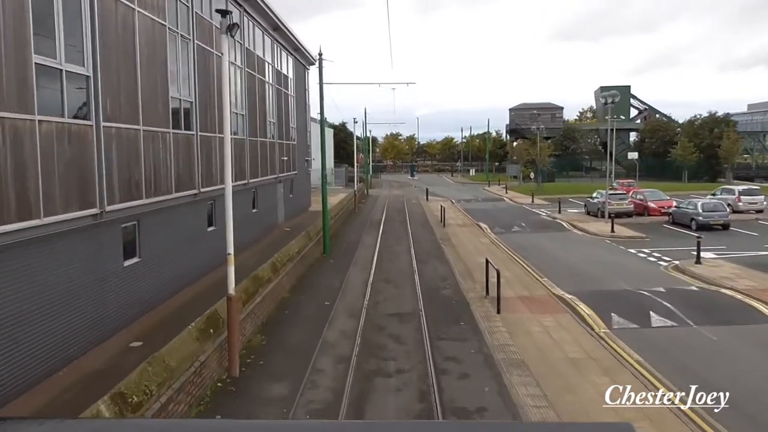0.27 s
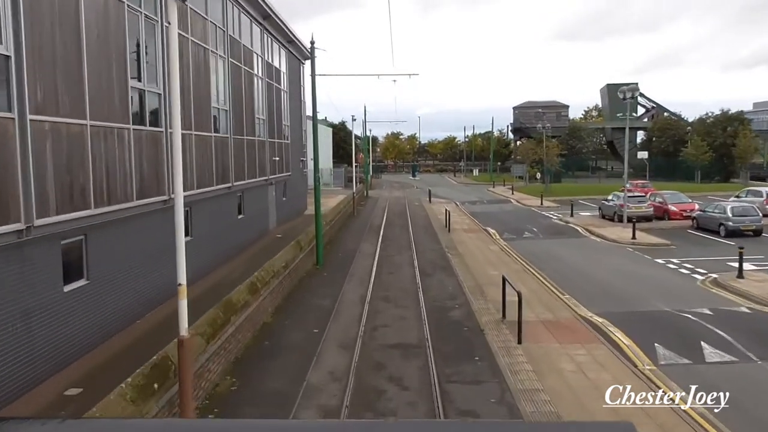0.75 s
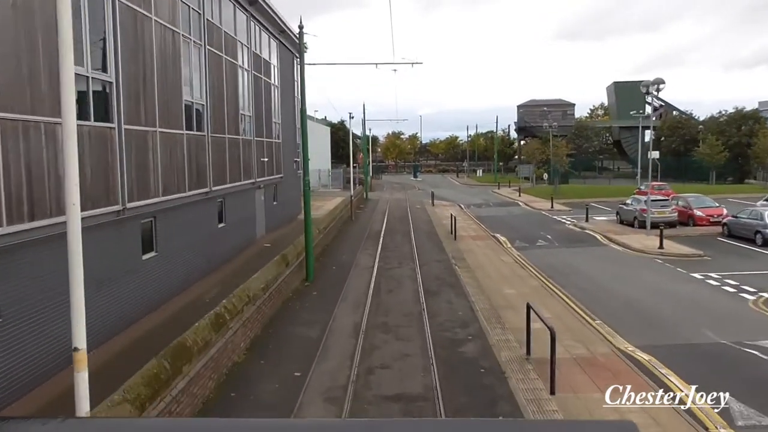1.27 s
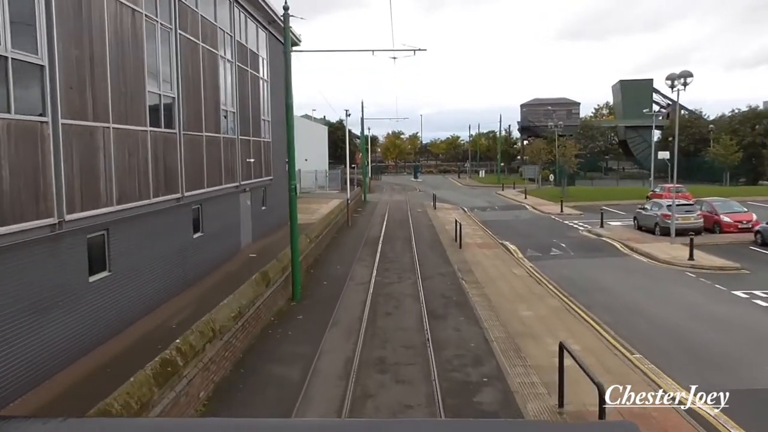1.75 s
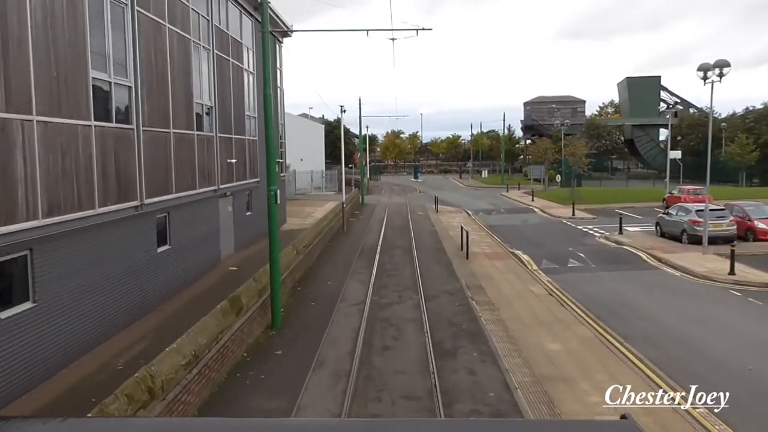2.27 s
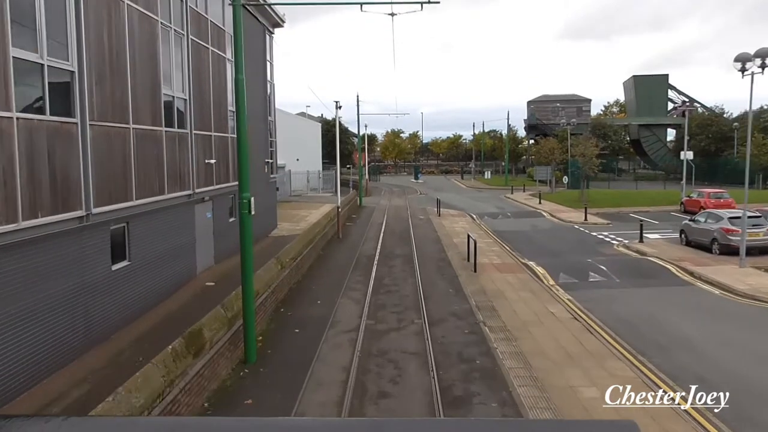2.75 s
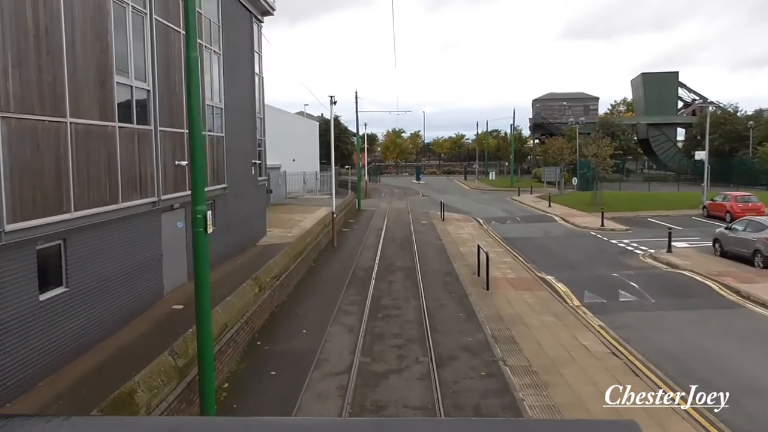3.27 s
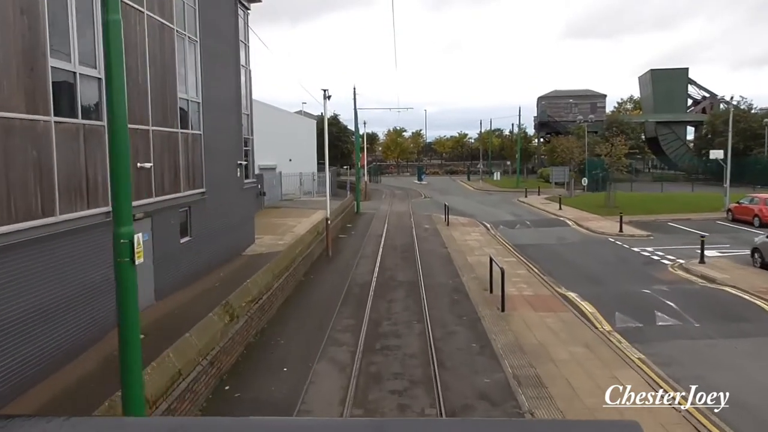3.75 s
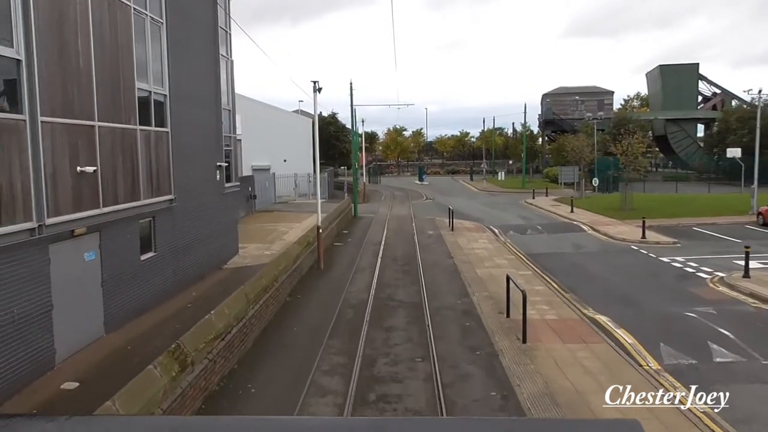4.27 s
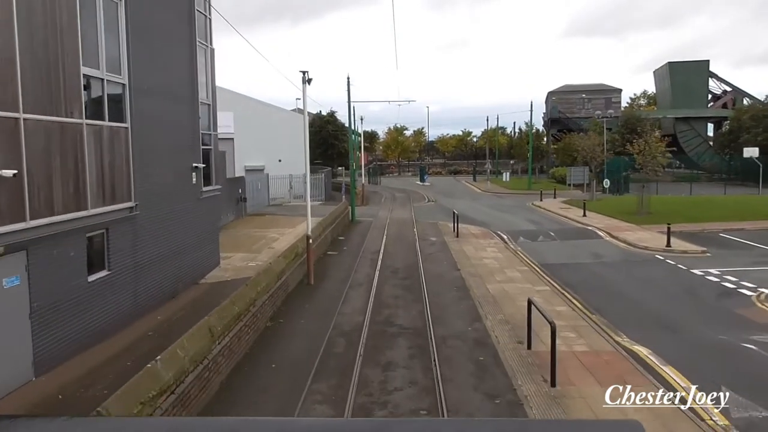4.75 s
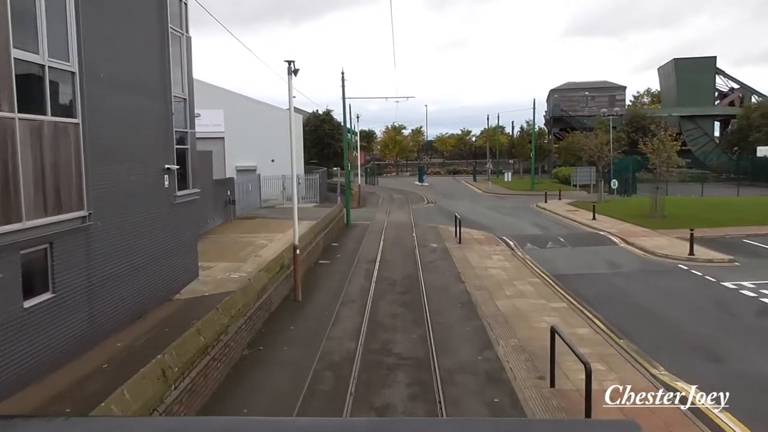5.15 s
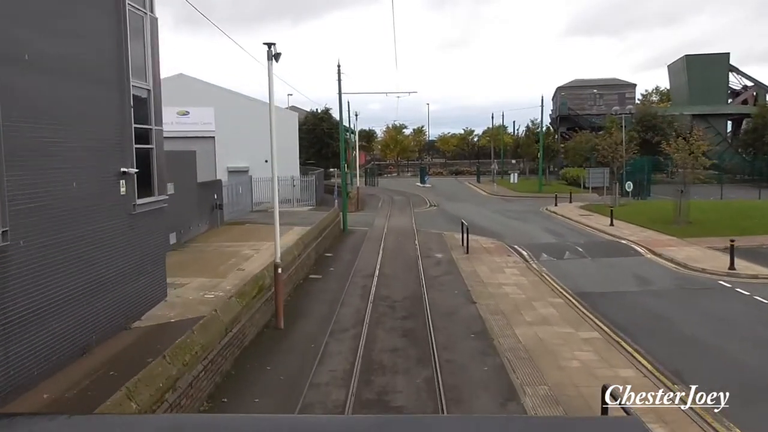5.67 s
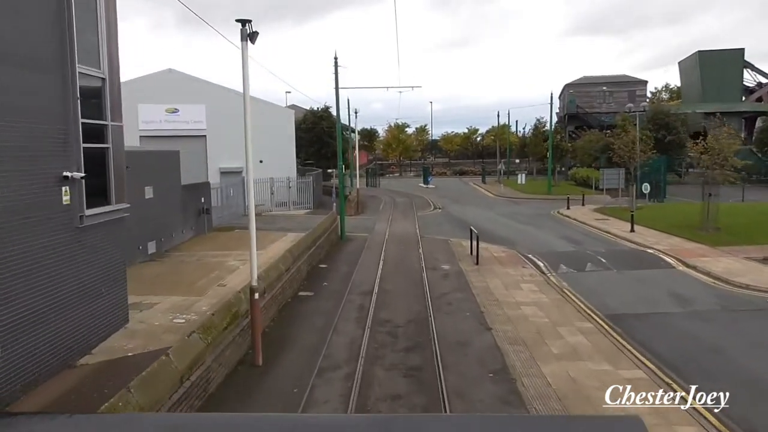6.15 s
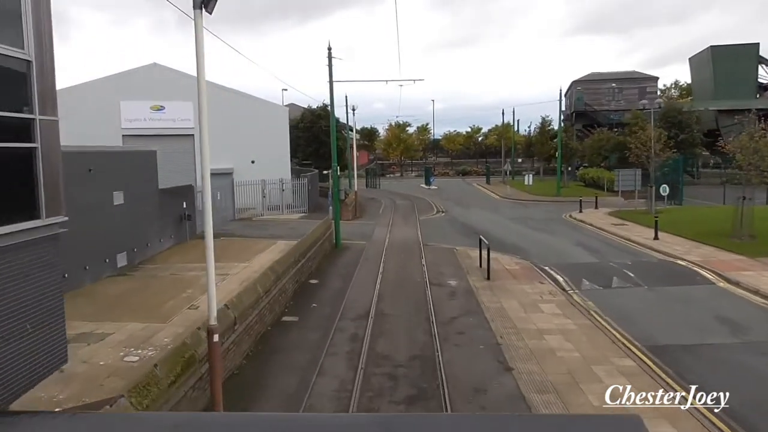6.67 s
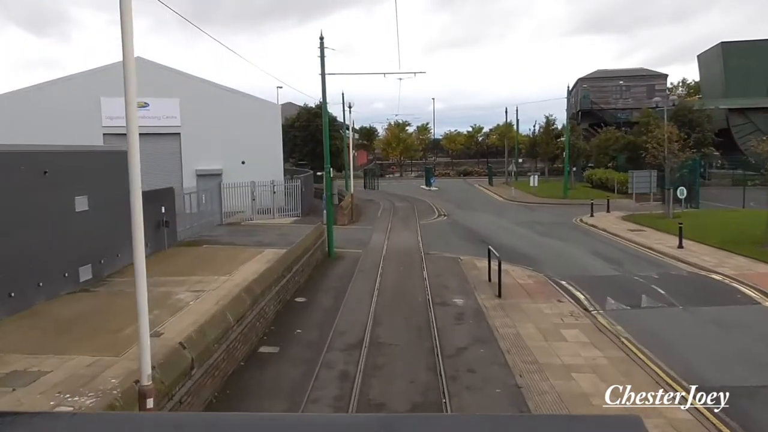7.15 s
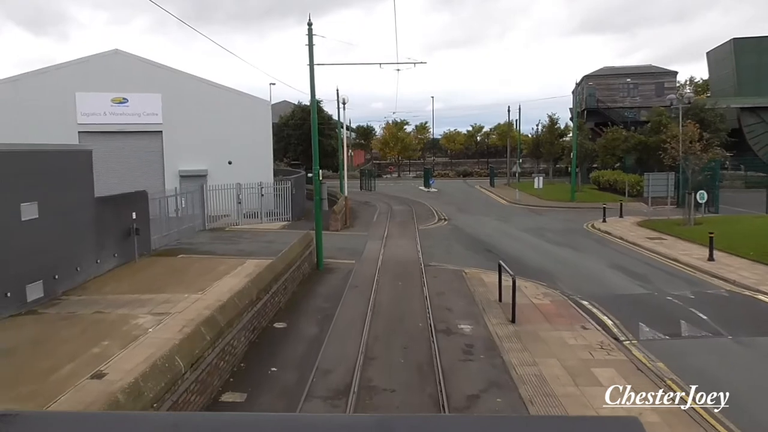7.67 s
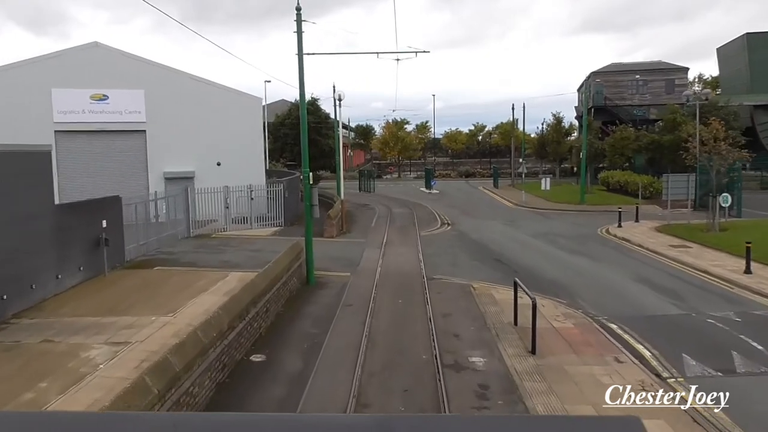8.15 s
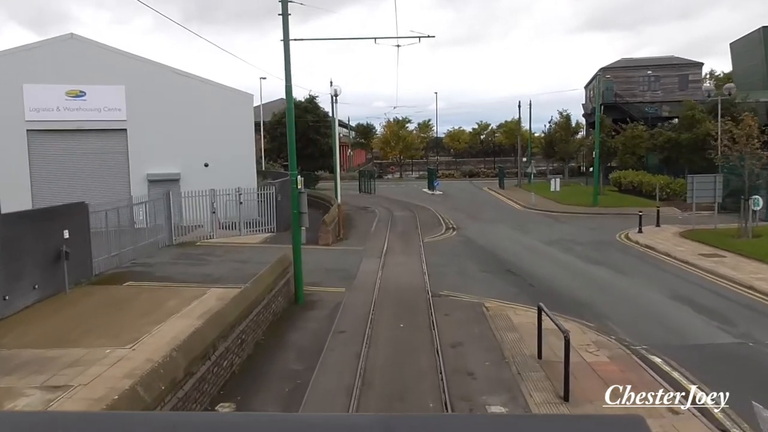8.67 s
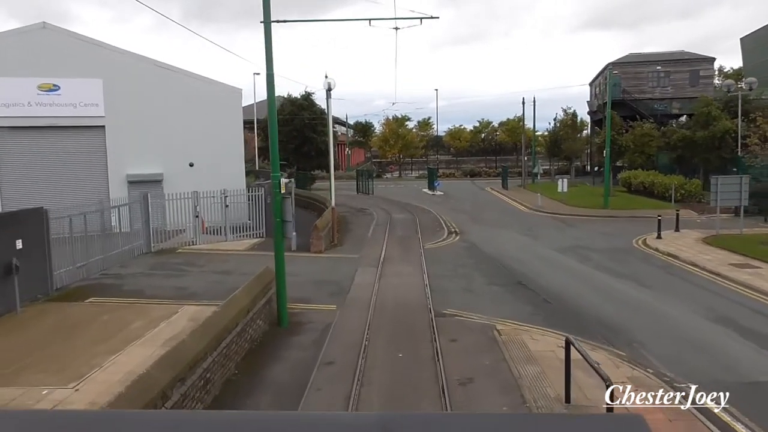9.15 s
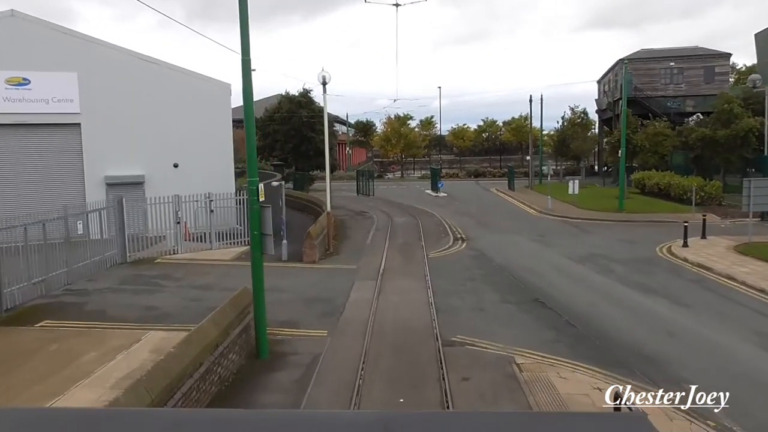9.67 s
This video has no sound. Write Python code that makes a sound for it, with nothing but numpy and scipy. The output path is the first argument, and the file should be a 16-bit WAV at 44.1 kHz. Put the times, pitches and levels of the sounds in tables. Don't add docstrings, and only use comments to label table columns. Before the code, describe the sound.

Riding at the front of a vintage tram: deep wheel rumble, wavering motor hum, faint wire hiss, irregular thumps and brief rattles.

```python
import sys
import numpy as np
from scipy import signal
from scipy.fft import rfft, irfft, next_fast_len
from scipy.io import wavfile
from scipy.ndimage import uniform_filter1d

SR = 44100
rng = np.random.default_rng(int(sys.argv[2]) if len(sys.argv) > 2 else 0)


def store_pcm(level_fs):
    pcm = np.round(np.clip(level_fs, -1, 1) * 32767).astype(np.int16)
    wavfile.write(sys.argv[1], SR, np.atleast_2d(pcm).T)


def amplitude_ratio(level_db):
    exponent = np.asarray(level_db, float) / 20
    return 10 ** exponent


N = 437472
STEP = 64
CONTROL_T = np.arange(0, N, STEP) / SR


def in_time(rows):
    s, *columns = np.transpose(rows)
    return [np.interp(np.arange(N) / SR, s, column) for column in columns]


def per_sample(control):
    return np.interp(np.arange(N) / STEP, np.arange(len(control)), control)


def swells(rows, order):
    rises = (db * np.exp(-abs((CONTROL_T - s) / length) ** order) for s, db, length in rows)
    return per_sample(sum(rises))


def rms_one(x):
    return x / np.sqrt(np.mean(x ** 2) + 1e-20)


def drift(rate):
    r = np.exp(-2 * np.pi * STEP * rate / SR)
    noise = rng.standard_normal(N // STEP + 1002)
    slow = signal.lfilter([1], [1, -2 * r, r * r], noise)[1000:]
    return per_sample(rms_one(slow - slow.mean()))


def ring(clicks, hz, t60):
    r, w = amplitude_ratio(-60 / (max(t60, .001) * SR)), 2 * np.pi * hz / SR
    return signal.lfilter([0, np.sin(w)], [1, -2 * r * np.cos(w), r * r], clicks + 1e-18)


def narrow(hz, width_hz):
    t60 = np.log(1000) / (np.pi * width_hz)
    return rms_one(ring(ring(rng.standard_normal(N), hz, t60), hz, t60))


def wobbly(hz, wobble_hz):
    return np.sqrt(2) * np.sin(2 * np.pi * np.cumsum(hz + wobble_hz * drift(13.3)) / SR)


def coloured(spectrum, modes=(), count=1, shared_db=0., own_db=0., rate=10.):
    size = next_fast_len(N)
    hz = np.maximum(np.arange(size // 2 + 1) * SR / size, 1)
    at, level_db = np.transpose(spectrum)
    shape_db = np.interp(np.log(hz), np.log(at), level_db, left=-150, right=-150)
    for mode_hz, width_hz, mode_db in modes:
        shape_db = shape_db + mode_db / (1 + (2 * (hz - mode_hz) / width_hz) ** 2)
    noise = rfft(rng.standard_normal(size)) * amplitude_ratio(shape_db)
    place = np.clip(np.log(hz / at[0]) / np.log(at[-1] / at[0]), 0, 1) * (count - 1)
    together, out = shared_db * drift(rate), 0
    for k in range(count):
        band = irfft(noise * np.clip(1 - abs(place - k), 0, 1), size)[:N]
        out = out + band * amplitude_ratio(together + own_db * drift(rate))
    return rms_one(out)


# t/s, rolling level/dB, roughness as grind level/dB
RAILS = [(0, -15, -51), (0.5, -18, -55), (0.85, -15.5, -50.5), (1.4, -16, -52), (2.1, -18.5, -53.5),
         (3.0, -15, -49), (3.55, -16.5, -53.5), (4.1, -19, -56), (4.5, -17.5, -53), (5.3, -16.5, -51.5),
         (5.8, -15.5, -49.5), (7.0, -17, -48), (8.0, -16.5, -48), (8.3, -18.5, -50), (8.85, -16, -49),
         (9.2, -23, -59), (9.6, -25, -59), (9.92, -22.5, -63)]


def rails():
    return in_time(RAILS)


# t/s, swell level/dB, back-off level/dB
BUMPS = [(0.25, 3, 0.5), (0.8, -1.5, 0.5), (1.451, 5, 7.5), (1.91, 5, 1), (2.24, 1.5, 1), (2.7, -1.5, 4.5),
         (3.37, -0.5, -0.5), (3.63, 0, -0.5), (3.73, -1, 3.5), (4.299, 0.5, -0.5), (5.05, 2, 2.5),
         (5.52, 0.5, -1), (6.181, 2, 1), (6.769, -1, -0.5), (8.128, -0.5, 2), (8.62, 0, 4.5),
         (8.803, -1, 3.5), (8.93, 3.5, 5), (9.07, 4, 1), (9.257, 11, 8), (9.36, 9, -2), (9.73, 8, 3)]


def jolts():
    rise_s, hold_s, fall_s = 0.031, 0.015, 0.11
    back_off_s, recover_s = 0.1, 0.18
    swell_db, back_db = 0, 0
    for s, up_db, down_db in BUMPS:
        late = np.maximum(CONTROL_T - s - hold_s, 0)
        rise = np.clip((CONTROL_T - s) / rise_s + 1, 0, 1)
        swell_db = swell_db + up_db * rise * np.exp(-late / fall_s)
        back_db = back_db - down_db * np.minimum(late / back_off_s, 1) * np.exp(-(late / recover_s) ** 2)
    return per_sample(swell_db), per_sample(back_db)


# f/Hz, level/dB per Hz
BODY_COLOUR = [(12, -67), (20, -33.5), (129, 0.5), (308, 1.5), (356, -4), (391, -3.5), (470, -11.5),
               (610, -12.5), (1030, -120)]
WHEEL_COLOUR = [(260, -7), (440, -0.5), (523, -9.5), (663, -4.5), (771, -7.5), (982, -10), (1030, -11),
                (1480, -19.5), (1640, -31.5), (1780, -39.5), (2500, -48.5), (3850, -120)]
GRIND_COLOUR = [(970, -13), (1650, 1), (2300, -1), (2880, -7), (3790, -4.5), (4450, -8.5), (4850, -10),
                (6500, -18), (8450, -40), (14300, -120)]
# f/Hz, width/Hz, level/dB over the layer
BODY_RESONANCES = [(123.4, 63, 5), (157, 36, 0), (203.7, 33, 3.5), (252, 34, 2.5), (326, 15, 4)]
WHEEL_RESONANCES = [(600, 8.5, 0.4), (665, 15, 1.8), (800, 31, 2.1), (1520, 36, 4.1), (1990, 120, 9.5),
                    (2130, 100, 8.6), (2390, 67, 2)]
GRIND_RESONANCES = [(2110, 120, -5), (3670, 300, -1), (6470, 400, 3)]
# t/s, rise level/dB, half length/s
RAIL_LUMPS = [(0.25, 1.5, 0.043), (0.55, -3, .15), (0.82, 2.5, 0.065), (0.91, -7, .015), (1.05, 1.5, .05),
              (1.6, -3, 0.053), (1.78, 2, .03), (1.83, -5.5, .02), (2.5, 1.5, 0.041), (2.62, -3, 0.066),
              (2.72, 5, 0.028), (2.77, -4, 0.022), (3.11, 0, 0.067), (3.52, 4, 0.023), (3.57, -2.5, 0.023),
              (3.64, 1.5, .02), (3.68, 0.5, .015), (3.86, -5.5, 0.032), (5.15, -1, .04), (5.29, -2, 0.022),
              (5.7, 0.5, .06), (6.81, 0.5, .02), (6.92, 4.5, 0.044), (7.08, -1.5, .05), (7.25, -6, 0.022),
              (7.31, 3, 0.051), (7.66, 2.5, 0.021), (7.72, -1, 0.019), (8.13, 3.5, 0.018),
              (8.17, -0.5, 0.029), (8.85, 4, 0.15), (9.21, -1, 0.031), (9.51, -3, .03), (9.57, 1, 0.016),
              (9.62, -0.5, 0.012), (9.68, -0.5, .025), (9.82, 3, 0.014)]


def rolling(level_db, rough_db, swell_db):
    body_db = level_db + 0.96 * swell_db + swells(RAIL_LUMPS, order=2)
    grind_db = rough_db + 0.64 * swell_db
    wheel_db = level_db - 10 + 0.36 * (rough_db - rough_db.mean()) + swell_db
    shake = drift(11.0)
    body = coloured(BODY_COLOUR, BODY_RESONANCES, count=6, own_db=0.33, rate=14.8)
    wheels = coloured(WHEEL_COLOUR, WHEEL_RESONANCES, count=4, own_db=0.96, rate=11.0)
    grind = coloured(GRIND_COLOUR, GRIND_RESONANCES, count=4, shared_db=0.4, own_db=1.3, rate=12.0)
    body *= amplitude_ratio(body_db - 1 + 1.13 * shake)
    wheels *= amplitude_ratio(wheel_db + 1.0 * shake)
    grind *= amplitude_ratio(grind_db + 2.0 + 0.4 * shake)
    return body + wheels + grind


# t/s, tooth mesh level/dB, mesh f/Hz
MOTOR_LOAD = [(0, -30.5, 402.5), (1.3, -27.5, 397.1), (1.65, -28.5, 398), (2.15, -26, 396), (2.5, -26, 392),
              (2.85, -27, 391.5), (3.3, -24, 388.5), (3.7, -29.5, 396), (4.0, -41.5, 391.3),
              (4.3, -22.5, 390), (4.55, -30, 392.6), (4.78, -24, 394.7), (5.25, -28.5, 393.6),
              (5.6, -35.5, 397), (5.87, -27, 390.4), (6.1, -35, 392.3), (8.5, -37, 384.4), (9.92, -43, 396)]
# t/s, rise level/dB, half length/s
WHINE_RISES = [(0.19, 9, 0.11), (1.0, 8, .1), (1.3, 8, .12), (1.75, 11.5, 0.36), (2.45, 14, 0.081),
               (2.9, 15.5, 0.13), (5.1, 11, 0.048), (5.7, 9, 0.05), (7.12, 10.5, 0.12), (8.0, 13, 0.14),
               (8.416, 18, 0.064), (9.6, 9.5, 0.043)]


def gears(rough_db, swell_db):
    mesh_db, mesh_hz = in_time(MOTOR_LOAD)
    whine_db = -50 + swells(WHINE_RISES, order=2)
    mean_db = rough_db.mean()
    flange_db = mean_db - 8.5 + 1.8 * (rough_db - mean_db) + 0.9 * swell_db
    mesh_gain = amplitude_ratio(mesh_db + 0.8 * drift(9.4) + 3 * drift(20.6))
    mesh = mesh_gain * (0.9 * wobbly(mesh_hz, 7.0) + 0.4 * narrow(393.0, 40.0))
    whine = amplitude_ratio(whine_db + 2.7 * drift(13.0)) * wobbly(962, 11.43)
    flange = amplitude_ratio(flange_db - 10.5) * narrow(4850, 160)
    return mesh + whine + flange


# t/s, sizzle level/dB
WIRE_PRESSURE = [(0, -58.5), (0.55, -63.5), (0.75, -57), (1.45, -55.5), (2.05, -58), (2.25, -58),
                 (2.75, -58.5), (3.4, -56.5), (3.75, -62.5), (4.2, -61), (4.45, -57.5), (4.78, -57),
                 (5.2, -59.5), (6.97, -56.5), (7.1, -52), (8.1, -53.5), (8.3, -56.5), (8.95, -56.5),
                 (9.06, -63)]
# f/Hz, level/dB per Hz
HISS_COLOUR = [(3940, -19), (6700, -2.5), (7090, -1), (8060, 1.5), (9600, -7.5), (12500, -45),
               (21100, -120)]
SIZZLE_COLOUR = [(6000, -36), (10200, 0.5), (11800, 0), (13500, -5), (15500, -14)]
# f/Hz, width/Hz, level/dB over the layer
HISS_RESONANCES = [(6420, 580, -8.5), (8200, 550, -0.5), (9950, 400, -2)]
SIZZLE_RESONANCES = [(10000, 350, -3), (10230, 400, 1), (11400, 200, 1.5), (12600, 300, -2)]


def trolley(swell_db):
    sizzle_db, = in_time(WIRE_PRESSURE)
    hiss_db = sizzle_db + 4.5 + 0.072 * swell_db
    chatter = drift(14.0)
    hiss = coloured(HISS_COLOUR, HISS_RESONANCES, count=2, own_db=0.9, rate=7.1)
    sizzle = coloured(SIZZLE_COLOUR, SIZZLE_RESONANCES, count=3, own_db=0.8, rate=9.0)
    return amplitude_ratio(hiss_db - 1.8 + 0.51 * chatter) * hiss + amplitude_ratio(sizzle_db - 0.6 + 1.0 * chatter) * sizzle


def strike(times_s, levels_db, modes, spread_db):
    out, own = np.zeros(N), rng.normal(0, spread_db, (len(times_s), len(modes)))
    for (hz, mode_db, t60), own_db in zip(modes, own.T):
        kicks = np.zeros(N)
        kicks[np.round(times_s * SR).astype(int)] = amplitude_ratio(levels_db + mode_db + own_db)
        out += ring(kicks, hz, t60)
    return out


# t/s, peak level/dB
RAIL_FLAWS = [(0.08, -6), (0.123, -5), (0.208, -22), (0.238, -11), (1.065, -15), (1.276, -20), (1.314, -10),
              (1.46, -20), (2.054, -12), (3.301, -32), (3.405, -5), (3.503, -11), (3.745, -4), (4.443, -24),
              (4.699, -8), (4.782, -10), (5.048, -25), (5.184, -13), (5.515, -15), (5.897, -18),
              (6.503, -7), (6.531, -9), (6.565, -21), (7.316, -7), (7.426, -8), (7.596, -18), (8.692, -17),
              (8.747, -15), (8.956, -16), (9.004, -30), (9.046, -14), (9.146, -11), (9.246, -16),
              (9.272, -9), (9.328, -16), (9.359, -15), (9.736, -25), (9.775, -9), (9.867, -29),
              (9.897, -19)]
# f/Hz, level/dB, fall by 60 dB/s
KNOCK_NOTES = [(420, 0.5, 0.036), (600, -3.5, 0.018), (865, -18, .02), (1220, -17, .015)]


def knocks():
    s, peak_db = np.transpose(RAIL_FLAWS)
    out = strike(s, peak_db - 7, KNOCK_NOTES, spread_db=2.0)
    return signal.sosfilt(signal.butter(2, 1800, fs=SR, output="sos"), out)


# t/s, rise level/dB, half length/s
FLANGE_BRUSHES = [(0.1, 3, .15), (0.8, 7, .12), (1.31, 14, .09), (1.84, 17, .07), (1.96, 3, 0.055),
                  (2.23, 12, .07), (2.45, 8, .07), (2.68, 3, .1), (2.95, 8, .16), (3.28, 12, 0.13),
                  (3.5, 2, .1), (4.6, 3, .3), (5.25, -11, .05), (5.45, 13, .06), (5.57, 10, .05),
                  (6.0, -1, .25), (6.6, 13, .08), (6.95, 7, .12), (7.45, 15, 0.32), (7.95, 13, .12),
                  (8.42, 13, .08), (8.75, 10, .2), (9.7, 2, .06)]
# t/s, rise level/dB, half length/s
COASTING = [(6.65, 25.3, .17)]


def singing():
    sing = amplitude_ratio(-71 + swells(FLANGE_BRUSHES, order=2) + 1.5 * drift(25.0)) * narrow(3725, 230)
    return sing + amplitude_ratio(-51 + swells(COASTING, order=4)) * narrow(442, 25.0)


def rattle():
    hits = (rng.random(N) < 500 / SR) * rng.uniform(0, 1.3, N)
    r = np.exp(-1 / (0.001 * SR))
    return 0.7 + amplitude_ratio(-11) * np.e * (1 - r) * signal.lfilter([1], [1, -2 * r, r * r], hits)


# t/s, thump level/dB, clatter level/dB, length/s
AXLES = [(0.121, -6, -54, 0.04), (0.208, -18, -44, 0.04), (1.068, -23, -44, 0.06), (1.281, -5, -45, 0.05),
         (1.456, -13, -46, 0.11), (1.470, -17, -28, 0.095), (1.912, -22, -21.5, 0.041),
         (1.928, -18, -30, 0.073), (1.957, -19, -33, 0.11), (2.235, -18, -53, 0.054),
         (3.499, -4, -55, 0.06), (3.719, -10, -44, 0.053), (3.761, 0, -53, 0.14), (4.446, -24, -36, 0.045),
         (5.048, -3, -24.5, 0.12), (5.074, -3, -38, 0.027), (5.105, -10, -35, 0.06),
         (5.129, -10, -39, 0.08), (5.518, -12, -26, 0.024), (5.532, 0, -21.5, 0.031),
         (5.55, -18, -30, 0.05), (5.575, -26, -34, 0.12), (6.52, -13, -26, 0.036), (6.936, -13, -41, 0.042),
         (7.312, -13, -31, 0.052), (8.691, -4.5, -49, 0.065), (8.747, -7, -37, 0.041),
         (8.931, -8, -31, 0.026), (9.008, -2.5, -55, 0.02), (9.045, -3.5, -41, 0.034),
         (9.083, -4.5, -54, 0.025), (9.142, -12, -54, 0.038), (9.239, -22, -48, 0.066),
         (9.271, -19, -36, 0.015), (9.328, -23, -42, 0.029), (9.356, -15, -45, 0.027),
         (9.383, -8.5, -53, 0.031), (9.42, -7, -55, 0.036), (9.714, -14, -49, 0.064),
         (9.739, -7, -55.5, 0.049), (9.768, -6.5, -40, 0.017), (9.786, -2.5, -64, 0.025),
         (9.845, -11.5, -60, 0.028), (9.869, -11, -66, 0.071), (9.898, -10, -46, 0.02)]
# f/Hz, level/dB, fall by 60 dB/s
THUMP_NOTES = [(134, 9, 0.0084), (185, 6.5, 0.023), (300, -0.5, 0.012), (398, -6, 0.038), (628, -24, 0.027)]
# f/Hz, level/dB per Hz
CLATTER_COLOUR = [(500, -4), (900, 11.5), (1500, -3.5), (2000, -16), (3500, -20.5), (5500, -25.5),
                  (8500, -23.5), (13000, -46)]
# f/Hz, width/Hz, level/dB over the layer
CLATTER_RESONANCES = [(980, 110, 1.5), (1990, 160, 7), (2430, 150, 3), (3300, 160, 3.5), (3730, 120, 9),
                      (4900, 300, 6)]


def joints():
    clatter = np.zeros(len(CONTROL_T))
    for s, _, clatter_db, length in AXLES:
        age = np.clip((CONTROL_T - s) / max(length, .005), 0, 3)
        clatter += amplitude_ratio(clatter_db - 2.0) * np.minimum(age * 6, 1) * np.exp(-age ** 1.78)
    s, thump_db, *_ = np.transpose(AXLES)
    thumps = strike(s, thump_db - 9.5, THUMP_NOTES, spread_db=0.33)
    soft = signal.sosfilt(signal.butter(3, [95, 900], "band", fs=SR, output="sos"), thumps)
    return soft + per_sample(clatter) * rms_one(rattle() * coloured(CLATTER_COLOUR, CLATTER_RESONANCES))


# t/s, rise level/dB, half length/s
HEAVES = [(0.35, 17, 0.15), (1.2, 4, 0.25), (1.6, 12, .1), (2.7, -1, 0.092), (3.15, -7, .12),
          (3.75, 17.5, 0.27), (4.5, 4, .08), (6.95, 6, 0.09), (7.4, 13, .1), (8.3, 19, 0.23),
          (8.85, 22, 0.18)]
# f/Hz, level/dB per Hz
BOOM_COLOUR = [(25, -23), (60, -11), (95, -4), (125, -6), (170, -45)]


def boom():
    return amplitude_ratio(-44.5 + swells(HEAVES, order=2)) * coloured(BOOM_COLOUR)


# t/s, peak level/dB, f/Hz
PANEL_NOTES = [(1.451, -12, 229), (1.467, -10.5, 343), (1.491, -16, 245), (1.908, -11.5, 203),
               (1.921, -15, 356), (2.058, -11, 240), (5.282, -12, 330.4), (5.532, -15, 383),
               (9.077, -14.5, 185), (9.13, -12.5, 204), (9.556, -20, 230), (9.618, -21, 246),
               (9.712, -13.5, 175), (9.846, -13, 197)]


def panels():
    out, age = np.zeros(N), np.arange(2000) / SR
    rise = age / 0.0053
    for s, peak_db, hz in PANEL_NOTES:
        i = round(s * SR)
        swell = np.e * rise * np.exp(-rise)
        out[i:i + len(age)] += amplitude_ratio(peak_db) * swell * np.sin(2 * np.pi * hz * age)
    return out


# t/s, peak level/dB, f/Hz
TINY_CONTACTS = [(3.116, -49, 13400), (3.719, -44, 2600), (3.757, -49, 3200), (3.817, -46, 2600),
                 (4.022, -58, 3000), (5.054, -34, 2500), (5.077, -34, 3300), (5.33, -48, 2500),
                 (5.532, -33, 3300), (5.623, -39, 12800), (5.6235, -43, 7500), (5.6375, -42, 12500),
                 (5.638, -43, 7950), (9.068, -43, 3520), (9.089, -38, 2600), (9.146, -44, 4400),
                 (9.147, -41, 3300), (9.425, -38, 2210), (9.770, -43, 3640), (9.800, -38, 2200),
                 (9.917, -38, 5030)]


def ticks():
    out = np.zeros(N)
    for s, peak_db, hz in TINY_CONTACTS:
        i = round(s * SR)
        fade = np.exp(-np.arange(900) * hz / (9.0 * SR))
        tone = ring(rng.standard_normal(900) * fade, min(hz, 15000), 0.0019)
        out[i:i + 900] += (amplitude_ratio(peak_db) * tone / abs(tone).max())[:N - i]
    return out


# t/s, widening level/dB, half length/s
WIDE_STRETCHES = [(0.66, 17, 0.15), (1.15, 13, 0.2), (1.6, 11, 0.22), (2.2, 18, 0.13), (3.15, 18.5, 0.46),
                  (4.1, 12, 0.11), (4.45, 18, 0.091), (5.5, 16.5, 0.68), (6.4, 15, 0.2), (6.85, 10, 0.22),
                  (7.55, 20, 0.49), (8.4, 13, 0.2), (9.1, 15, 0.08), (9.6, 13, 0.28)]


def two_microphones(mid):
    band = signal.butter(3, [2200, 13000], "band", fs=SR, output="sos")
    treble = signal.lfilter([1, -.4], [1], signal.sosfilt(band, mid))
    width_db = -20.5 + 0.6 * swells(WIDE_STRETCHES, order=4) + 2.5 * drift(20.0)
    side = amplitude_ratio(width_db) * np.roll(treble, 1500)
    side += amplitude_ratio(-37 + 7 * drift(8)) * signal.lfilter([.3, -.285], [1, -.985], np.roll(mid, 900))
    return np.array([mid + side, mid - side])


def scene():
    level_db, rough_db = rails()
    swell_db, back_db = jolts()
    steady = rolling(level_db, rough_db, swell_db) + gears(rough_db, swell_db) + trolley(swell_db)
    steady += boom() + singing()
    return two_microphones(amplitude_ratio(back_db) * steady + joints() + ticks() + knocks() + panels())


# f/Hz, level/dB under its surroundings
DROPOUT_LIMIT = [(1500, -28), (3500, -7.5), (6000, -4), (10000, -3.5), (13000, -2), (15500, 0)]


def thin_treble(mid, side):
    hz, _, cells = signal.stft(np.array([mid, side]), SR, nperseg=2048)
    spread_db = 7
    scatter_db = np.repeat(rng.normal(0, spread_db, (65, cells.shape[2])), 16, axis=0)[:len(hz)]
    cells = cells * np.array([np.ones_like(scatter_db), amplitude_ratio(scatter_db - spread_db / 2)])
    power = abs(cells) ** 2
    patch = uniform_filter1d(uniform_filter1d(power, size=4, axis=1), size=2, axis=2)
    around = uniform_filter1d(uniform_filter1d(power[0], size=100, axis=0), size=2, axis=1)
    limit_db = np.interp(hz, *np.transpose(DROPOUT_LIMIT), left=-60)[:, None] + [[[0]], [[-9]]]
    lost = patch < around * amplitude_ratio(2 * limit_db)
    return signal.istft(cells * np.where(lost, amplitude_ratio(-22), 1), SR, nperseg=2048)[1][:, :N]


def roll_off(x):
    return signal.sosfilt(signal.butter(12, 15760, fs=SR, output="sos"), x)


def record(dry):
    limited = 1.135 * np.tanh(dry / 1.108)
    left, right = signal.sosfilt(signal.butter(2, 30, "high", fs=SR, output="sos"), limited)
    mid, side = thin_treble((left + right) / 2, (left - right) / 2)
    return roll_off(np.array([mid + side, mid - side]))


dry = scene()
out = record(dry)
store_pcm(out)
```